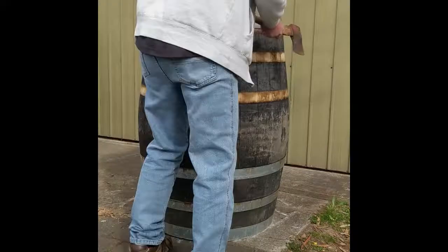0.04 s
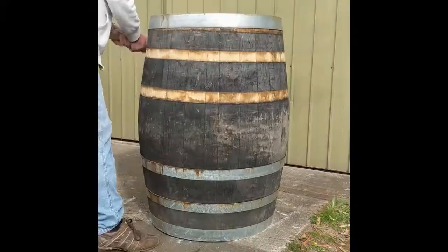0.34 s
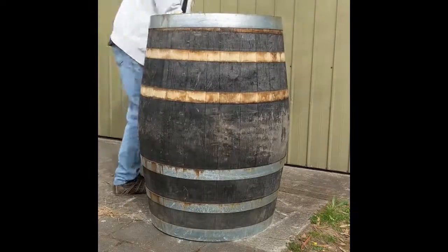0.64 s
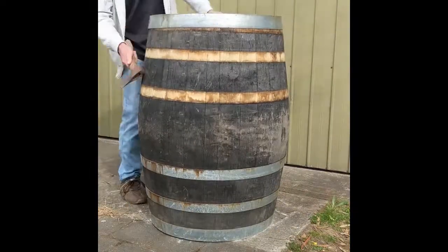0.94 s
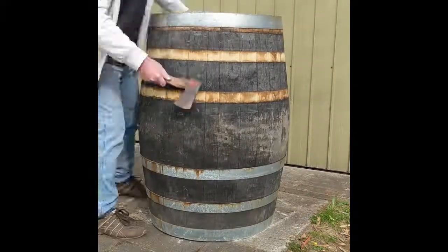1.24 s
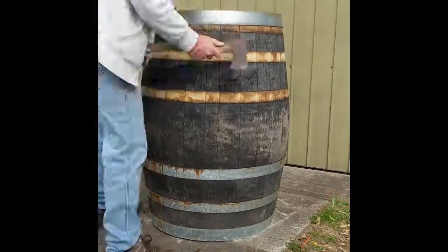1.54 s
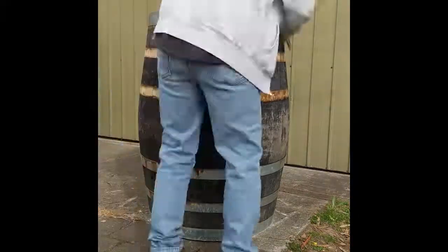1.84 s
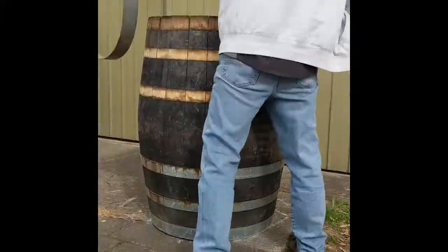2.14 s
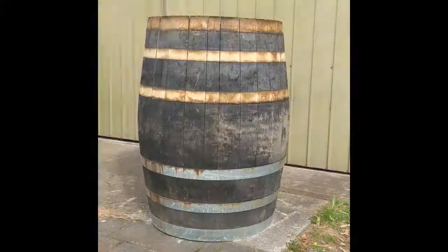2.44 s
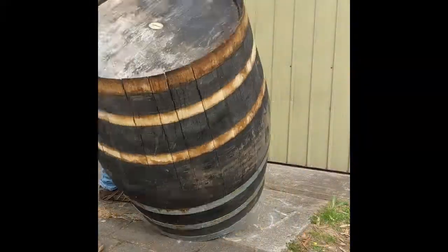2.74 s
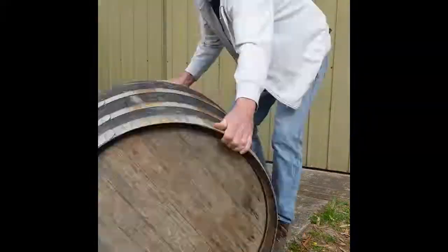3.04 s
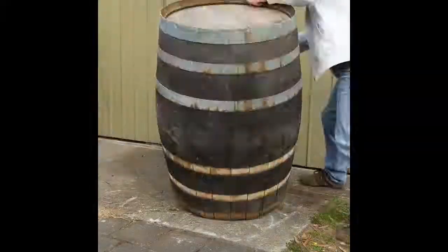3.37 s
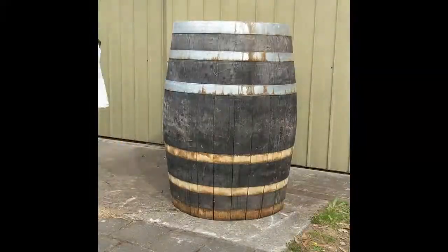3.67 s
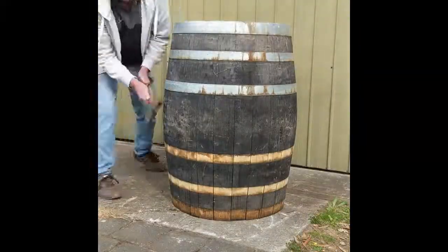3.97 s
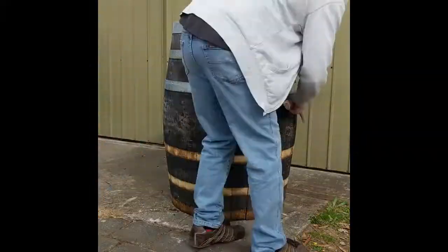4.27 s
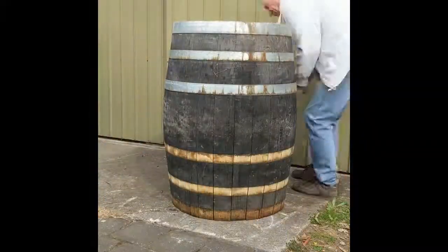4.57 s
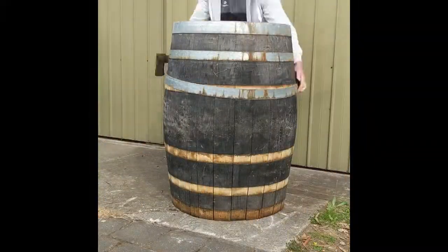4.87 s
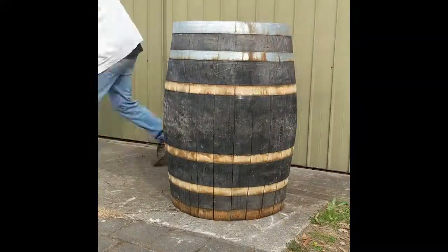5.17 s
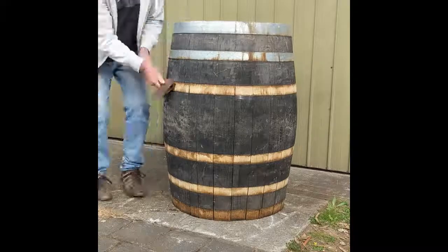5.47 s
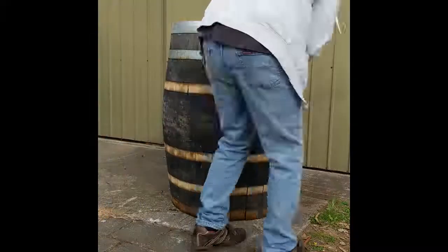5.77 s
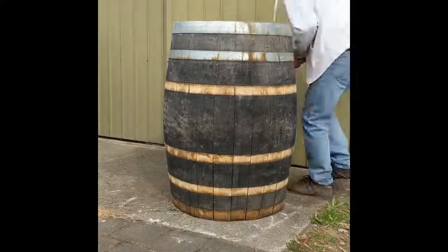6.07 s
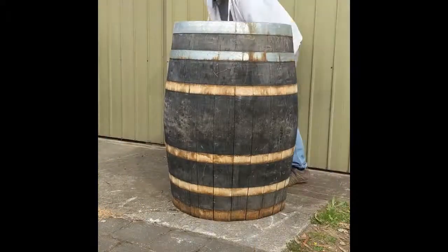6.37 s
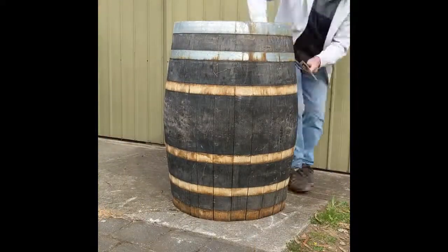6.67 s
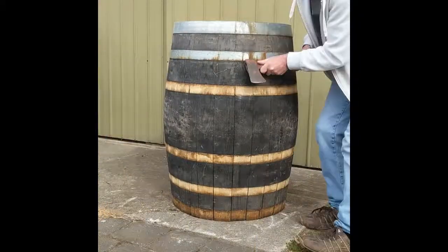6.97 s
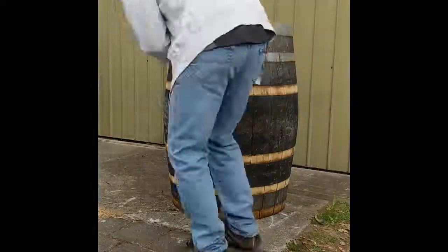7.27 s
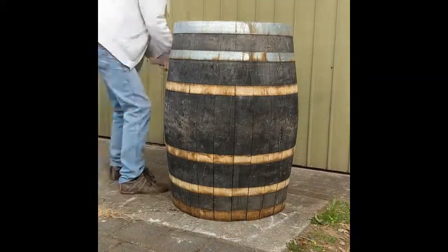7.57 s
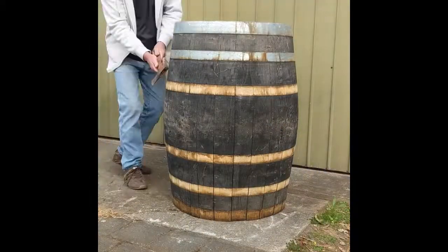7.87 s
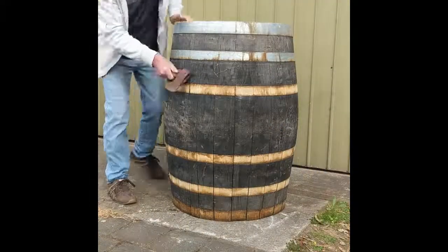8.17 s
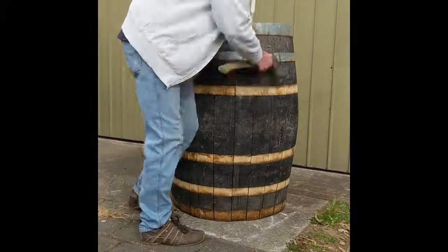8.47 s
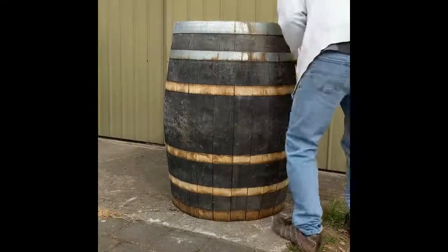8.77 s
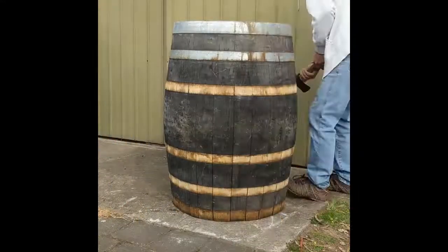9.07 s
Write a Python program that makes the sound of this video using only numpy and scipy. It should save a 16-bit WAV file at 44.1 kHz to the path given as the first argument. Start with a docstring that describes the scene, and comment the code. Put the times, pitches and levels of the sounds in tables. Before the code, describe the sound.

Quick, clipped hammer strikes on steel barrel hoops run together in choppy time-lapse bursts, shaking slack hoops and wooden staves. A short break brings hollow wooden bumps and gritty scrapes as the barrel is tipped over on stone, then a longer, sharper run of metallic clanks follows. Everything is dry and centered in front of the microphone, over very faint outdoor air and a far wavering whine that surfaces twice.

```python
"""Outdoors on paving, a cooper's job in time-lapse: hammer and driver knock the steel hoops off an oak
barrel, tipped over halfway through. Time jumps 30 times a second, so the blows crowd into a rattle of
short clanks that shake the slack hoops and staves. The hollow barrel scuffs and knocks on the stone;
a far whine comes and goes over faint open air."""
import sys
import numpy as np
from scipy import signal
from scipy.fft import rfft, irfft, next_fast_len
from scipy.io import wavfile
from scipy.ndimage import uniform_filter1d, map_coordinates

SR = 44100
rng = np.random.default_rng(int(sys.argv[2]) if len(sys.argv) > 2 else 0)


def materialize(psi):
    """Save the field psi as 16-bit PCM at rate SR to the path in sys.argv[1].

    A 1-D psi becomes a single channel; in a 2-D psi each row is a channel.
    """
    bounded = np.clip(np.atleast_2d(psi).T, -1, 1)
    quanta = np.round(bounded * 32767).astype(np.int16)
    wavfile.write(sys.argv[1], SR, quanta)


N = 402191
TIME = np.arange(N) / SR
JUMP_HZ, TOP_HZ = 30, 16000
HOOP_CHANGES_S = [3.0, 6.56]  # next hoop begun

# blows and rebounds: t/s, steel level/dB, clank/dB re steel, treble/dB re steel, nominal t60/s
BLOWS = [(0.0512, -38.5, -4, 3, 0.0017), (0.057, -44.5, 5.0, -8.5, 0.016), (0.338, -46, 10, -5, 0.01),
         (0.3679, -35.5, 0, -1.5, 0.015), (0.416, -43.5, 10.5, -14, 0.013), (0.433, -36.5, 4.5, -4, 0.045),
         (0.484, -47, 15.5, -15, 0.016), (0.504, -35.5, -1, 0.5, 0.022), (0.5607, -34.5, -1.5, -4.5, 0.012),
         (0.6539, -47, 10, -12.0, 0.022), (0.6674, -50, 6, -11, 0.038), (0.6822, -34, 1, -2, 0.014),
         (0.7359, -33, -4.5, -6, 0.017), (0.7844, -32, -5.5, -4.5, 0.013), (0.835, -57, 5, -23, 0.02),
         (0.882, -53, 8, -6, 0.014), (0.893, -48, 19.5, -19, 0.01), (0.922, -69.5, 25, -5, 0.022),
         (0.9982, -46, 7, -12.5, 0.0044), (1.0046, -45.5, 14, -14.0, 0.0041), (1.0264, -34, -1, -4, 0.042),
         (1.0395, -38, 4.5, 5, 0.0038), (1.0888, -41, 4.5, -7, 0.06), (1.132, -33, 6.5, -9, 0.031),
         (1.1667, -38, -4, -8.5, 0.0045), (1.1784, -32.0, 3, -4, 0.024), (1.208, -69, 11, -14, 0.015),
         (1.22, -29.5, 2, -7, 0.027), (1.2664, -39.0, -2, -3, 0.011), (1.277, -35.5, -2, -10.0, 0.0088),
         (1.3096, -52, 12.5, -18, 0.028), (1.331, -42.5, 4, -5, 0.043), (1.346, -32.5, 1, -3, 0.0093),
         (1.431, -35, 7, 2.5, 0.055), (1.4418, -37.5, 1, -1, 0.022), (1.4879, -34, -2, 0, 0.015),
         (1.5251, -38, 4.5, -8, 0.023), (1.667, -47, 1.5, -11, 0.0079), (1.6752, -49.5, 12, -10, 0.018),
         (1.7018, -40.5, -1, 5, 0.0059), (1.71, -37.5, -1.5, 3, 0.014), (1.753, -35, 2, 0.0, 0.021),
         (1.764, -54, 1, -8, 0.015), (1.787, -32.5, -2, -8.5, 0.023), (1.8254, -31.5, -5, -3.5, 0.0025),
         (1.9636, -35.5, 2.5, 5, 0.007), (1.966, -33.5, -0.5, 0.5, 0.035), (2.0045, -44, 0, -10.5, 0.005),
         (2.011, -34.5, 2, -5, 0.04), (2.0508, -34.5, 1, 1, 0.018), (2.0977, -49, 4, -4, 0.044),
         (2.1358, -43.5, 11, -8, 0.0029), (2.1419, -44, 13, -10.0, 0.0078),
         (2.421, -41, -3.5, -5.5, 0.0079), (3.036, -56, -7, 2, 0.013), (3.2821, -45, 10, -28, 0.043),
         (3.9163, -42, 1, -10, 0.016), (3.9505, -29, -13, -1, 0.017), (4.033, -43, -18, 1, 0.066),
         (4.0815, -44.5, 7.5, -15, 0.039), (4.103, -38, -5.5, -3.5, 0.025), (4.144, -53, 14, -9, 0.043),
         (4.171, -51, 10, -14, .04), (4.1852, -30, -7, -5, 0.0027), (4.22, -42, -1, -8, 0.0096),
         (4.238, -28, -7, -3.5, 0.03), (4.299, -30, -7, -4, 0.032), (4.3665, -45, -3, -3, 0.035),
         (4.399, -46.5, 9.5, -16, 0.033), (4.4151, -32, -3.5, -2.5, 0.014), (4.435, -41, -1, -3, 0.022),
         (4.466, -33, -1.5, -3.5, 0.039), (4.5164, -41.5, 6.5, -17, 0.01), (4.5209, -37, -5.5, -2, 0.025),
         (4.563, -33, -4.5, -5, 0.022), (4.6287, -35, -0.5, -6.5, 0.035), (4.6532, -39.5, 3, -5, 0.005),
         (4.6607, -43, -3, 0.0, 0.0082), (4.6728, -47, 8, -16, 0.056), (4.6898, -33, -0.5, -7, 0.026),
         (4.716, -48, 6, -10, .02), (4.727, -47, 6, -10.0, 0.019), (4.74, -31.5, -5.5, -4, 0.018),
         (4.764, -47, 0, -9.0, 0.014), (4.8023, -32, -6, -2.5, 0.015), (4.828, -40.5, -4, 1.0, 0.032),
         (4.847, -32.5, -8.0, -5, 0.0096), (4.88, -36, -5, -4, 0.026), (4.9387, -48.5, -14, -5.0, 0.021),
         (4.964, -52, 2, -11, 0.021), (4.9905, -41.5, 1, -11, 0.032), (5.287, -49.5, -9, 2.5, 0.044),
         (5.3342, -46, -7.5, 1.5, 0.014), (5.458, -33, -5, 1.5, 0.018), (5.517, -29, -7, -2.5, 0.015),
         (5.5647, -39.5, -7, -4, 0.0079), (5.568, -29.5, -7.5, -2.5, 0.018),
         (5.6209, -28.5, -11.5, -3, 0.016), (5.668, -40, -4, -2, 0.078), (5.6756, -27.5, -19, 0.5, 0.014),
         (5.727, -27, -14, 1, 0.012), (5.793, -33, -9.5, -7, 0.068), (5.8527, -29, -12, 2.5, 0.022),
         (5.865, -48, 7, -6, 0.018), (5.8954, -32.5, -6, 2, 0.023), (5.9028, -27.5, -24, -3.5, 0.018),
         (5.9576, -27.5, -15.5, -2, 0.016), (6.0228, -30.5, -8.5, -0.5, 0.015),
         (6.066, -34.5, -10.5, -11, 0.0036), (6.0738, -29.5, -6.5, -2.5, 0.02),
         (6.123, -27.5, -7, -6.5, 0.023), (6.186, -28.5, -5, -2, 0.016), (6.214, -45, -7, 4, 0.023),
         (6.2526, -29.5, -2.5, -5, 0.016), (6.2969, -32.5, -5, -6, 0.033), (6.3483, -30.5, -3, -3.5, 0.021),
         (6.382, -47, 2, -8, 0.032), (6.3942, -30.5, -2.5, -2, 0.012), (6.442, -28.5, -4, -4, 0.018),
         (6.461, -52, 11.5, -10, 0.035), (6.4814, -30, -7, -1, 0.026), (6.5008, -44.5, 1, 8, 0.023),
         (6.63, -42, 4, -14, 0.008), (6.6374, -33.5, -3.5, -6.5, 0.017), (6.666, -43, -4, -12.0, 0.026),
         (6.6775, -43.5, 5.5, -16, 0.014), (6.6865, -27, -10, -3, 0.007), (6.7277, -34, -4, -4.5, 0.076),
         (6.7754, -39, 0.5, -19, 0.018), (6.804, -31.5, -8, -3, 0.0086), (6.8119, -30, -12.5, -1, 0.013),
         (6.892, -30.5, -12.5, 0, 0.0049), (6.9503, -30, -10, 0.5, 0.019), (6.9999, -30, -10, -4, 0.026),
         (7.0077, -26.5, -18, -4.5, 0.0062), (7.0613, -29.5, -14.5, -2, 0.0091),
         (7.1221, -29.5, -16, 1, 0.0082), (7.1667, -27, -15, -2, 0.0076), (7.174, -26.5, -12, -2.5, 0.017),
         (7.287, -33, -10, -4, 0.05), (7.3088, -37, -2.5, -1, 0.012), (7.3378, -39, -15, -5, 0.0062),
         (7.3442, -28, -7.5, -3.5, 0.026), (7.3805, -37.5, -8, -10, 0.02), (7.431, -28, -16, -7.0, 0.022),
         (7.4517, -37, -9, 0, 0.0042), (7.466, -48, 0, -12, 0.029), (7.4808, -28, -10.5, -5.5, 0.0099),
         (7.6512, -52, 11, -20, 0.0055), (7.69, -34.0, -3.5, 1, 0.0046), (7.742, -28, -7, -0.5, 0.032),
         (7.757, -42, 1, -5.5, 0.077), (7.799, -38, -4, -0.5, 0.062), (7.8445, -28.5, -3.5, -0.5, 0.021),
         (7.998, -35.5, -4, -5.0, 0.042), (8.039, -31, -6, -2, 0.0099), (8.0447, -29.5, -12, -2, 0.02),
         (8.116, -49.5, 5, -20.0, 0.0094), (8.1639, -29, -11.5, -0.5, 0.056),
         (8.2154, -29.5, -11, 0, 0.0099), (8.249, -46, -6, -2, .005), (8.2628, -28.5, -12.5, -5, 0.048),
         (8.3973, -30.5, -12, -1.5, 0.037), (8.4517, -30.5, -6.5, -1.5, 0.013), (8.47, -47, 3, -4, 0.041),
         (8.4969, -37.5, -9, -10, 0.037), (8.5391, -33.5, -13, 0, 0.0041), (8.5444, -31, -10.5, 1, 0.012),
         (8.635, -30, -7.5, 0.5, 0.033), (8.7469, -42.0, 2, -12.5, 0.019), (8.7896, -34.5, -4.5, 3, 0.0042),
         (8.8648, -42.5, -21, -6, 0.046), (8.917, -25.0, -15, -6, 0.02), (8.9823, -29, -4, -1, 0.017),
         (9.0158, -42.5, -4, -2, 0.0081)]
# strong hoop modes: f/Hz, nominal lead over the weak modes for hoop 1/dB, hoop 2/dB, hoop 3/dB
HOOP_MODES = [(1278, 13.5, 12, -2.5), (1437, 7, 6, -1), (1526, 7, 14, -2), (1662, -15, 14.5, 11.5),
              (2068, 9, 11, 3), (2790, 17.5, 14, 8.5), (3477, 10, 4.5, 1.5), (3680, 1, 11, -8),
              (3950, 9, 1.5, 9), (4320, 0, 13, 1), (4746, -4, 6, 9), (5050, -8, 8, 12.5), (5540, 4, 10, 14),
              (6010, 8, 7, 10), (6980, 7, 9, 9), (7260, -5, 13.5, 0), (7810, 15, 4, 13),
              (8470, -14, 11, 13.5)]
# spectrum of the hollow barrel on stone: f/Hz, level/dB
BARREL_SPECTRUM = [(30, -7.5), (130, -12.5), (280, -5.5), (420, 0), (540, 6.5), (800, 1.5), (1100, -4.5),
                   (1800, -19), (4000, -67), (16000, -43)]
# spectrum of loose staves: f/Hz, level/dB
STAVE_SPECTRUM = [(40, 7.5), (400, -3), (700, 13.5), (1000, 18), (1300, 11), (2100, 12), (3000, 5.5),
                  (5000, -2.5), (16000, -10.5)]


def undb(db):
    """Decibels to gain."""
    return 10 ** (np.asarray(db) / 20)


def unit(x):
    """Scale to rms 1."""
    return x / np.sqrt(np.mean(x ** 2))


def curves(table, at_s):
    """Interpolate a table's columns over time."""
    times_s, *columns = np.transpose(table)
    return [np.interp(at_s, times_s, column) for column in columns]


def spectrum_gain(spectrum, hz):
    """Gain of a spectrum at the given frequencies."""
    knots_hz, db = np.transpose(spectrum)
    return undb(np.interp(np.log(hz + 1), np.log(knots_hz), db))


def colour(x, spectrum):
    """Filter by a spectrum."""
    size = next_fast_len(x.shape[-1])
    gain = spectrum_gain(spectrum, np.fft.rfftfreq(size, 1 / SR))
    return irfft(rfft(x, size) * gain, size)[..., :x.shape[-1]]


def add(out, start_s, sound):
    """Mix a sound in at a time."""
    i = max(int(start_s * SR), 0)
    out[..., i:i + sound.shape[-1]] += sound[..., :N - i]


def grains(rate_hz, spread_db):
    """Tiny random contacts of uneven size."""
    size = undb(spread_db * np.minimum(rng.exponential(size=N), 3))
    return (rng.random(N) < rate_hz / SR) * rng.choice([-1., 1.], N) * size


def jumps(spread_db):
    """A new random factor after each time jump."""
    moment = (TIME * JUMP_HZ).astype(int)
    steps = undb(spread_db * rng.standard_normal(moment[-1] + 1))
    return uniform_filter1d(steps[moment], size=90)


def until_jump(start_s, t, cut_phase=.78):
    """Gain that cuts a ring short just ahead of a time jump."""
    end_s = (np.ceil((start_s + .006) * JUMP_HZ - cut_phase) + cut_phase) / JUMP_HZ - start_s
    return np.exp(-np.maximum(t - end_s, 0) / .001)


def modes(t, count, hoop_ratio=1):
    """Frequencies and undamped sines: count weak modes of staves and hoops, then the strong hoop modes."""
    body_spectrum = [(40, -4.5), (150, -7.5), (300, -24.5), (540, 12), (950, 3.5), (1500, 15), (2400, 8.5),
                     (3250, 13), (4900, 16), (6500, 13.5), (9000, 11.5), (13000, 10.5), (16000, 1.5)]  # staves and hoops: f/Hz, level/dB
    weak_hz = 40 + (TOP_HZ - 40) * ((np.arange(count) + rng.random(count)) / count) ** 2
    hz = np.concatenate([weak_hz, np.array(HOOP_MODES)[:, 0] * hoop_ratio])
    gain = spectrum_gain(body_spectrum, hz) * hz ** (1 / 4)  # sparser high modes carry more each
    phase = 2 * np.pi * (hz[:, None] * t + rng.random((len(hz), 1)))
    return hz, gain[:, None] * np.sin(np.float32(phase))


def hoop_lead_db(at_s):
    """Lead of the strong modes of the hoop being worked on."""
    return np.transpose(HOOP_MODES)[1:][np.digitize(at_s, HOOP_CHANGES_S)]


def strike_weights(hz, times_s, humps=26, spread_db=2, scatter=0.6):
    """Each blow lands on a new spot and weights the modes anew; axes: blow, mid/side, mode."""
    place = np.interp(np.log(hz), np.log([300, TOP_HZ]), [0, humps - 1])
    humps_db = spread_db * rng.standard_normal((len(times_s), humps))
    spot_gain = undb([np.interp(place, np.arange(humps), row) for row in humps_db])
    weight = rng.standard_normal((len(times_s), 2, len(hz)))
    # the strong modes answer every blow
    strong = weight[:, :, -len(HOOP_MODES):]
    lead = undb(hoop_lead_db(times_s) - 3)[:, None]
    strong[:] = ((1 - scatter) * np.sign(strong) + scatter * strong) * lead
    return weight * spot_gain[:, None]


def detuned(sound, t, ratio):
    """Shift a blow's pitch, leaving the contact (t = 0) in place."""
    return np.array([map_coordinates(channel, [(t * ratio - t[0]) * SR], order=5) for channel in sound])


def hammer_blows(crack_db=4, crack_s=0.00054, tail_db=-13, tail_t60_s=0.088, preroll_s=.008):
    """Each blow on the hoop swells in very briefly, then cracks, clanks and rings faintly (mid, side)."""
    t = np.arange(int(SR / 20)) / SR - preroll_s
    age_s = np.maximum(t, 0)
    times_s, steel_db, clank_db, treble_db, t60_s = np.transpose(BLOWS)
    thud_db = -11.5 + 0.74 * clank_db  # stave thud grows with the clank
    t60_s = np.maximum(t60_s, .005)[:, None]
    hz, rings = modes(t, count=420)
    weight = strike_weights(hz, times_s)
    mode_band = np.digitize(hz, [1000, 2450, 7650])  # thud, clank, steel, treble
    strong = np.arange(len(hz)) >= len(hz) - len(HOOP_MODES)
    fading_s = np.maximum(age_s - 0.19 * t60_s, 0)  # driver chatter delays the decay
    lead_in = undb(-24.5) * np.exp(-abs(t) / 0.00055)
    tail = undb(tail_db - 60 * age_s / tail_t60_s)
    cut = until_jump(times_s[:, None], t)[:, None]
    bands = [(thud_db, 1), (clank_db, 1.15), (0, .85), (treble_db, .72)]
    sounds = 0
    for k, (band_db, t60_scale) in enumerate(bands):
        decay = undb(-60 * fading_s / (t60_s * t60_scale))
        crack = 1 + undb(crack_db) * k / 3 * np.exp(-age_s / crack_s)
        rise = 1 - np.exp(-age_s * (k + 1) / (0.0042 * t60_s))  # slower for low modes, glancing blows
        band = mode_band == k
        lasting = band & strong
        part = (weight[:, :, band] @ rings[band]) * (lead_in + rise * decay * crack)[:, None]
        part += (weight[:, :, lasting] @ rings[lasting]) * (rise * tail)[:, None]
        part *= cut
        part /= np.sqrt(np.sum(part ** 2, axis=2, keepdims=True) / (SR / 100))  # energy of 10 ms at rms 1
        sounds = sounds + part * undb(steel_db + band_db)[:, None, None]
    # each hoop's pitch varies from blow to blow as it slackens
    pitch_spread = np.take([0.03, 0.02, 0.022], np.digitize(times_s, HOOP_CHANGES_S))
    ratios = 1 + pitch_spread * rng.standard_normal(len(times_s))
    out = np.zeros((2, N))
    for start_s, sound, ratio in zip(times_s - preroll_s, sounds, ratios):
        add(out, start_s, detuned(sound, t, ratio))
    return out


def hoop_clinks(gain_db=-1, attack_s=0.00063):
    """A squarely struck hoop sings one mode as a short, clear note."""
    clinks = [(0.892, 1280, -33, 0.031), (1.003, 1330, -41, 0.024), (1.133, 1330, -26, 0.044),
              (1.179, 1490, -28, .04), (1.220, 1254, -16, .035), (1.277, 1420, -28, .04),
              (1.524, 1330, -27, 0.032), (2.049, 1720, -33, .03), (2.142, 2030, -26, .05),
              (4.239, 6460, -23, 0.036), (4.298, 4580, -27, 0.037), (4.415, 1550, -43, 0.022),
              (4.468, 1840, -25, 0.035), (4.734, 1520, -24, 0.055), (4.741, 3510, -22, 0.036),
              (5.567, 1530, -35, 0.045), (5.622, 3615, -28, .06), (5.676, 1550, -29, 0.045),
              (5.853, 1690, -21, 0.033), (5.902, 1546, -26, 0.055), (5.957, 1520, -20.5, 0.024),
              (6.022, 1700, -21, 0.026), (6.124, 3490, -29, .05), (6.186, 1730, -38, .04),
              (6.349, 7280, -24, 0.037), (6.678, 1290, -28, 0.03), (6.81, 1700, -29, 0.038),
              (7.004, 4910, -19, 0.031), (7.173, 5860, -15.5, 0.024), (7.346, 3570, -22, 0.03),
              (7.745, 1465, -22, 0.021), (7.845, 3530, -24.5, 0.043), (7.968, 1580, -50, 0.2),
              (8.0, 1480, -43, 0.14), (8.4, 7280, -28, .045), (8.544, 6720, -22, .035),
              (8.636, 4894, -22, 0.033), (8.916, 1510, -20, 0.029)]  # t/s, f/Hz, level/dB, t60/s
    out, t = np.zeros(N), np.arange(int(SR / 20)) / SR
    for start_s, hz, db, t60_s in clinks:
        note = np.sin(2 * np.pi * (hz * t + rng.random())) * (1 - np.exp(-t / attack_s))
        add(out, start_s, note * undb(db + gain_db - 60 * t / t60_s) * until_jump(start_s, t))
    return out


def barrel_knocks(gain_db=-3, wood_db=-3, attack_s=0.0019):
    """The rim bumps the paving: the hollow barrel rings, wood thuds, grit crunches, the ground thumps."""
    knocks = [(0.194, -14.5, 3.5, -36, 0.016), (0.207, -27, -22, -33, 0.042),
              (0.223, -21.5, -20, -33, 0.038), (2.018, -19, -14, -30, 0.014),
              (2.383, -24.5, -19, -34, 0.025), (2.513, -30.5, -24, -35, 0.025),
              (2.632, -27.5, -11, -11, 0.033), (2.665, -30.5, -0.5, -27, 0.058),
              (2.73, -24, -16, -8, 0.026), (2.912, -27.5, -25, -27, 0.038), (2.936, -31.5, 4, -30, 0.041),
              (2.962, -22.5, 2, -35, 0.027), (2.975, -17, -12, -38, 0.027), (3.168, -30.5, 0, -29, 0.027),
              (3.276, -21.5, -2, -32, 0.04), (3.517, -14.5, -1.5, -25, 0.0076),
              (3.533, -19.5, -4.5, -6, 0.035), (3.55, -20, -13, -13, 0.02), (3.739, -28, -3, -20, 0.024),
              (3.979, -26, -18, -36, 0.054), (4.002, -27.5, 1, -38, 0.029), (8.232, -31.5, 3, -2, 0.047)]  # t/s, level/dB, relative crunch/dB, relative thump/dB, t60/s
    barrel_modes = [(295, -10.5), (440, -3.5), (550, 5), (630, -2.5), (710, -5), (800, -0.5), (900, -4),
                    (1070, -12.5)]  # f/Hz, level/dB
    ground_spectrum = [(30, 6.5), (120, 1), (250, -19), (700, -35), (16000, -77)]  # f/Hz, level/dB
    out, t = np.zeros(N), np.arange(int(SR / 5)) / SR
    hz, mode_db = np.transpose(barrel_modes)
    for start_s, db, crunch_db, thump_db, t60_s in knocks:
        envelope = undb(-60 * t / max(t60_s, .01)) * (1 - np.exp(-t / attack_s))
        sines = np.sin(2 * np.pi * (hz[:, None] * t + rng.random((len(hz), 1))))
        ring = unit(envelope * (undb(mode_db) @ sines))
        wood, grit, thump = (unit(envelope * colour(rng.standard_normal(len(t)), spectrum))
                             for spectrum in (BARREL_SPECTRUM, STAVE_SPECTRUM, ground_spectrum))
        body = unit(ring + undb(wood_db) * wood)
        sound = body + undb(crunch_db - 4) * grit + undb(thump_db - 3) * thump
        add(out, start_s, sound * undb(db + gain_db) * np.sqrt(np.mean(envelope ** 2)))
    return out


def shaking(strengths_db, rise_s=0.011, fall_s=0.012, usual_t60_s=0.014):
    """Amplitude of a shaken part: energy builds around each blow and dies away."""
    lag_s = np.arange(-SR // 4, SR // 2) / SR
    swell = np.exp(np.minimum(lag_s / rise_s, -lag_s / fall_s))
    energy = np.zeros(N)
    for (start_s, *_, t60_s), db in zip(BLOWS, strengths_db):
        length_db = -1.5 * np.log2(t60_s / usual_t60_s)
        add(energy, start_s + lag_s[0], undb(db + length_db) ** 2 * swell[lag_s >= -start_s])
    return np.sqrt(energy)


def sliding(events, gain_db=-1, edge_s=0.014):
    """Amplitude of sliding contacts: each swells, holds and fades."""
    t = TIME[::20]
    gain = 0
    for start_s, length_s, db in events:
        inside_s = np.minimum(t - start_s, start_s + length_s - t)
        gain = gain + undb(db + gain_db) * np.clip(inside_s / edge_s + .5, 0, 1)
    return np.interp(TIME, t, gain)


def backswing(depth_db=-8):
    """Lull while the hammer is raised, from the last time jump until the blow lands."""
    times_s = np.append(np.sort(np.array(BLOWS)[:, 0]), np.inf)
    next_blow_s = times_s[np.searchsorted(times_s, TIME)]
    raised = np.floor(next_blow_s * JUMP_HZ) == np.floor(TIME * JUMP_HZ)
    return uniform_filter1d(undb(depth_db * raised), size=40)


def barrel_scuff():
    """Tiny bumps on the stone sound through the hollow barrel."""
    bumps = grains(rate_hz=500, spread_db=3.5)
    return unit(colour(bumps, BARREL_SPECTRUM) * jumps(spread_db=1.5))


def stave_clatter(t60_s=0.016, count=300, hoop_db=-9):
    """Slack staves tap together; each tap rings the modes briefly."""
    taps = grains(rate_hz=350, spread_db=3.0)
    t = np.arange(int(SR / 5)) / SR
    hz, rings = modes(t, count)
    weight = undb(np.concatenate([np.zeros(count), np.full(len(HOOP_MODES), hoop_db)]))
    signs = rng.choice([-1., 1.], (2, len(hz)))[0]
    response = (signs * weight) @ rings * undb(-60 * t / t60_s)
    clatter = signal.oaconvolve(taps, response)[:N]
    return unit(colour(clatter, STAVE_SPECTRUM) * jumps(spread_db=1.5))


def hoop_jingle(count=95, t60_s=0.14, pitch_spread=0.04, spread_db=3.5):
    """A slack hoop jiggles on the staves; after each time jump it sits anew and sings in other modes."""
    jingle_spectrum = [(600, 6), (1500, 16.5), (2700, 25.5), (3600, 17.5), (5600, 14), (9000, 17.5),
                       (16000, 14)]  # f/Hz, level/dB
    size = int(SR / JUMP_HZ)
    out, t = np.zeros((2, N)), np.arange(size) / SR
    contacts = grains(rate_hz=220, spread_db=4.5)
    window = signal.windows.tukey(size, .1)
    for i in range(0, N, size):
        hz, rings = modes(t, count, 1 + pitch_spread * rng.standard_normal(len(HOOP_MODES)))
        lead_db = np.concatenate([np.zeros(count), hoop_lead_db(i / SR) - 9])
        weight = undb(lead_db + spread_db * rng.standard_normal(len(hz)))
        signs = rng.choice([-1., 1.], (2, len(hz)))
        ring = (signs * weight) @ rings * undb(-60 * t / t60_s)
        # already ringing; small contacts keep it going
        sound = 2 * ring + signal.fftconvolve(contacts[None, i:i + size], ring, axes=1)[:, :size]
        add(out, i / SR, unit(sound) * window)
    return unit(colour(out, jingle_spectrum))


def hoop_grate(rust_db=-8):
    """A loose hoop jingles over the wood as rust flakes off (mid, side)."""
    # f/Hz, level/dB
    rust_spectrum = [(600, -1), (1400, 18), (3400, 12), (5500, 16.5), (8000, -5), (16000, -10)]
    flakes = np.array([grains(rate_hz=1800, spread_db=3.5) for _ in range(2)])
    rust = unit(colour(flakes, rust_spectrum))
    return unit((hoop_jingle() + undb(rust_db) * rust) * jumps(spread_db=1.5))


def loose_parts(idle_scuff_db=-60, idle_staves_db=-68, idle_hoops_db=-73):
    """Barrel, staves and hoops, shaken by blows or pushed by hand, never quite still: wood, hoops."""
    shifts = [(0.058, 0.087, -63, -54.5), (0.11, 0.23, -49, -56.5), (0.18, 0.14, -54, -67),
              (0.518, 0.3, -58, -39.5), (0.828, 0.055, -68, -38.5), (1.215, 0.06, -43.5, -62),
              (1.342, 0.31, -52, -53.5), (2.244, 0.037, -45, -66), (2.392, 0.089, -46, -75),
              (2.608, 0.2, -43.5, -55.5), (2.839, .16, -48.5, -55.5), (3.024, 0.16, -56, -55.5),
              (3.165, 0.08, -45, -55), (3.37, 0.31, -54.5, -60), (3.73, 0.084, -48.5, -54.5),
              (3.961, 0.084, -67, -42.5), (5.456, 0.12, -47, -56), (5.806, 0.09, -46.5, -64),
              (6.14, 0.17, -49, -44), (6.893, 0.078, -41.5, -42), (7.71, 0.22, -57, -54),
              (7.918, 0.11, -44, -46), (8.23, 0.052, -39, -44), (8.232, 0.35, -51, -48.5),
              (8.781, 0.25, -58.5, -52)]  # barrel shifted on the paving: t/s, length/s, scuff/dB, clatter/dB
    grates = [(0.06, 0.072, -69), (0.52, 0.33, -53), (1.13, 0.445, -55), (1.9, 0.072, -45),
              (2.43, 0.079, -53.5), (2.66, 0.088, -61), (2.9, 0.07, -58), (3.06, 0.028, -51.5),
              (3.96, 0.54, -50.5), (4.52, 0.085, -38.5), (4.63, 0.27, -44), (4.93, 0.18, -54.5),
              (5.3, 0.078, -50), (5.64, 0.14, -41), (6.2, 0.33, -54), (6.1, 0.026, -42),
              (6.895, 0.098, -42.5), (7.065, 0.034, -39), (7.135, 0.021, -50), (7.965, 0.047, -43),
              (8.8, 0.022, -48), (8.93, 0.087, -45.5)]  # hoop sliding over wood: t/s, length/s, level/dB
    slack = [(0.35, 7.5, 4.5), (0.6, 14, 10), (1.0, 4.5, -23), (1.45, 19.5, -2), (1.7, 15.5, -14),
             (2.1, -10, 6.5), (4.0, 12.5, -44), (4.27, -13, -43), (4.5, -28, -3), (4.8, 9, 10),
             (5.5, 7, 7.5), (5.75, 16, 2.5), (6.2, 9, 11.5), (6.65, 0, 2.5), (7.0, 18, -1), (7.35, 13, 3.5),
             (8.0, 11.5, 4.5), (8.7, -22, -6)]  # looseness as a gain on the shaking: t/s, staves/dB, hoops/dB
    scuff_slide = sliding(np.array(shifts)[:, [0, 1, 2]])
    stave_slide = sliding(np.array(shifts)[:, [0, 1, 3]])
    slack_staves_db, slack_hoops_db = curves(slack, TIME)
    _, steel_db, clank_db, *_ = np.transpose(BLOWS)
    wood_shake, steel_shake = shaking(steel_db + clank_db), shaking(steel_db)
    lull = backswing()
    scuff_drive = np.hypot(scuff_slide, wood_shake * undb(-18))
    stave_drive = np.hypot(stave_slide, wood_shake * undb(slack_staves_db - 16.5)) * lull
    hoop_drive = np.hypot(sliding(grates), steel_shake * undb(slack_hoops_db - 15)) * lull
    scuff = barrel_scuff() * np.hypot(scuff_drive, undb(idle_scuff_db))
    staves = stave_clatter() * np.hypot(stave_drive, undb(idle_staves_db))
    hoops = hoop_grate() * np.hypot(hoop_drive, undb(idle_hoops_db))
    return scuff + staves, hoops


def far_whine(gain_db=-0.5, flutter_db=7.5, pitch_waver=0.026):
    """A distant rough tone and its octave, wavering, and stepping in pitch at each time jump."""
    spells = [
        [(3.05, 548, -61, -27), (3.3, 638, -94, -24), (3.4, 546.5, -59, -25), (3.48, 508.5, -62, -28),
         (3.6, 541, -74, -20), (3.77, 465, -55, -9), (3.91, 502, -60, -17), (3.98, 466, -58, -26),
         (4.25, 472, -78, -21)],
        [(7.58, 528.7, -55, -12), (7.65, 610, -58.5, 6), (7.78, 616.5, -48.5, -26), (7.88, 747, -46, 2),
         (7.92, 675, -41, -17), (7.98, 774, -50.5, 17.5), (8.02, 730, -56, 10), (8.1, 630, -60, -5),
         (8.19, 545, -51.5, 0), (8.33, 540.7, -59, 1), (8.6, 520.5, -61.5, -2), (9.12, 513, -73.5, 7)],
    ]  # two spells, each: t/s, f/Hz, level/dB, relative octave/dB
    stepped_s = (np.floor(TIME * JUMP_HZ) + .5) / JUMP_HZ
    out = np.zeros(N)
    for spell in spells:
        hz, db, octave_db = curves(spell, stepped_s)
        drift, flutter, octave_flutter = (unit(uniform_filter1d(rng.standard_normal(N), size=400))
                                          for _ in range(3))
        phase = 2 * np.pi * np.cumsum(hz * (1 + pitch_waver * drift) * jumps(spread_db=.22)) / SR
        fundamental = undb(flutter_db * flutter) * np.sin(phase)
        octave = undb(octave_db + flutter_db * octave_flutter) * np.sin(2 * phase)
        sounding = (TIME > spell[0][0]) & (TIME < spell[-1][0])
        envelope = uniform_filter1d(undb(db + gain_db) * sounding, size=90)
        out += np.sqrt(2) * (fundamental + octave) * envelope
    return out


def open_air(level_db=-64):
    """Faint, steady outdoor noise."""
    air_spectrum = [(30, -22), (120, -26), (280, -20), (520, -10), (1000, -20), (2000, -31), (5000, -31),
                    (16000, -31)]  # f/Hz, level/dB
    return undb(level_db) * unit(colour(rng.standard_normal(N), air_spectrum))


def jump_dips(start_phase=0.75, end_phase=0.94):
    """Gain that dips briefly before each time jump."""
    depths = [(0, -13), (6.4, -12), (8, -29)]  # t/s, depth/dB
    depth_db, = curves(depths, TIME)
    phase = TIME * JUMP_HZ % 1
    dipping = (phase > start_phase) & (phase < end_phase)
    return uniform_filter1d(undb(depth_db * dipping), size=40)


def scene():
    """All straight ahead; only the treble of the steel has some width."""
    side_spectrum = [(3600, -70), (4100, -25), (5500, -16), (7500, -11), (16000, -9.5)]  # stereo width of the steel: f/Hz, side level/dB
    wood, hoops = loose_parts()
    air = open_air()
    dips = jump_dips()
    steel_mid, steel_side = hammer_blows() + hoops * dips
    mid = steel_mid + hoop_clinks() + (wood + barrel_knocks() + far_whine() + air) * dips
    side = colour(steel_side, side_spectrum)
    return np.array([mid + side, mid - side])


def record(dry):
    """Steep low-pass at TOP_HZ."""
    return signal.sosfilt(signal.ellip(8, .2, 70, TOP_HZ, fs=SR, output="sos"), dry)


dry = scene()
out = record(dry)
materialize(out)
```